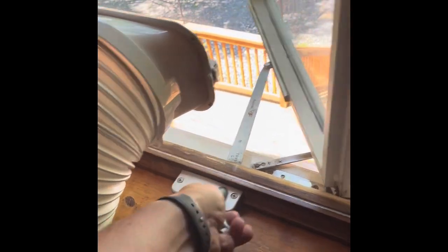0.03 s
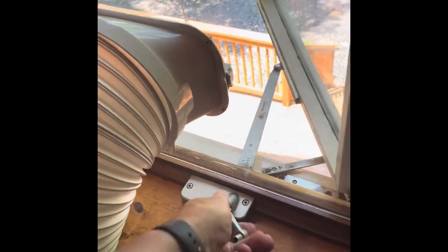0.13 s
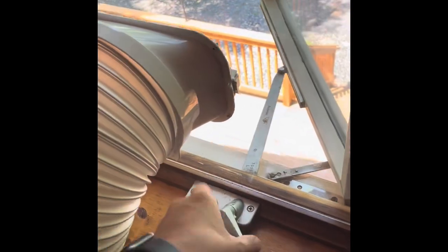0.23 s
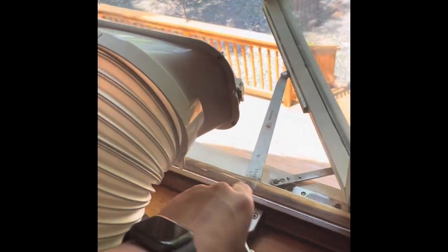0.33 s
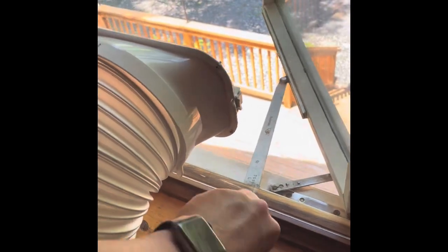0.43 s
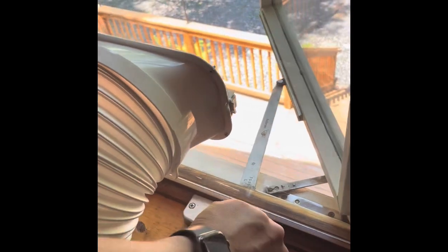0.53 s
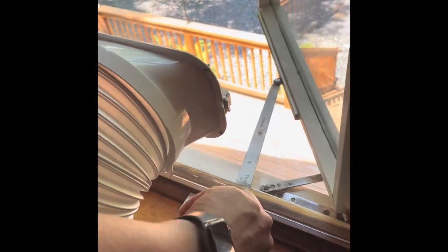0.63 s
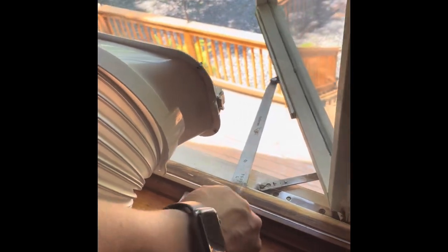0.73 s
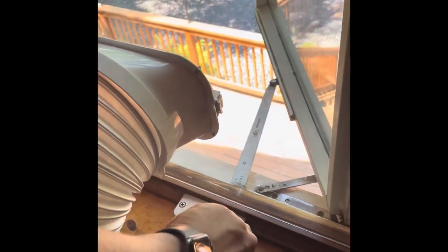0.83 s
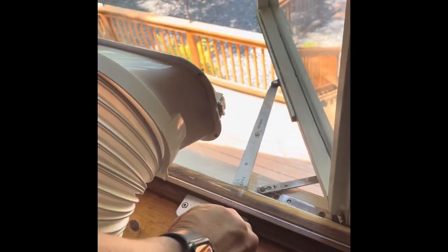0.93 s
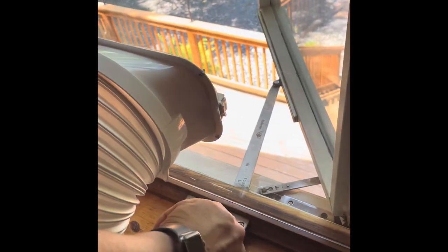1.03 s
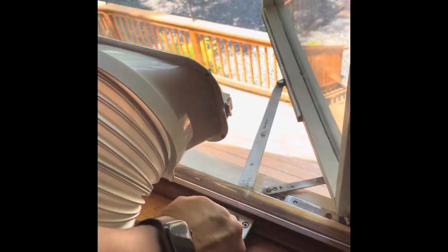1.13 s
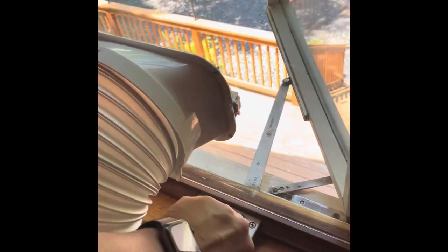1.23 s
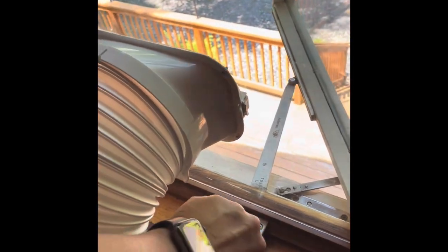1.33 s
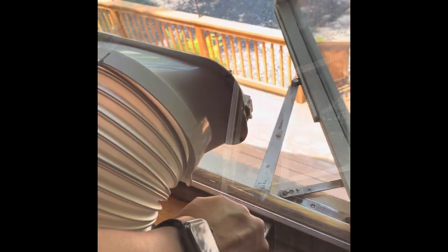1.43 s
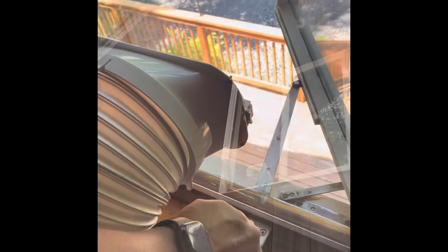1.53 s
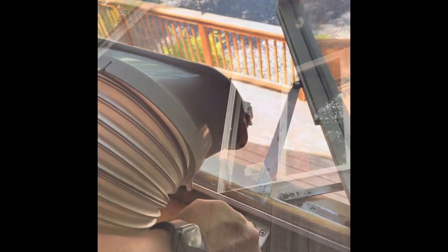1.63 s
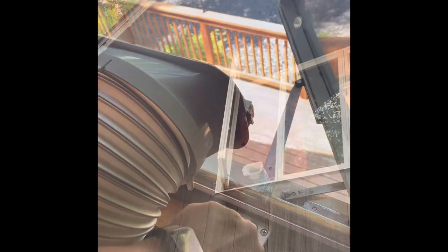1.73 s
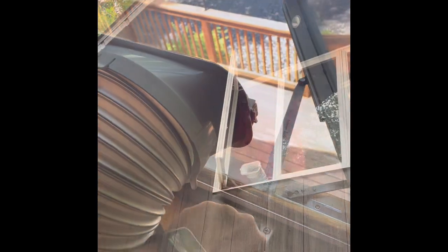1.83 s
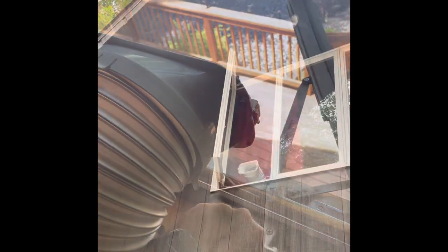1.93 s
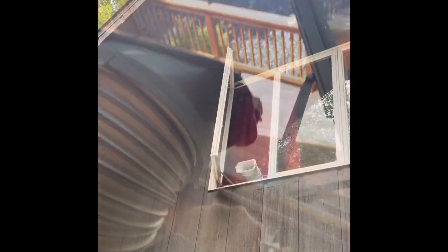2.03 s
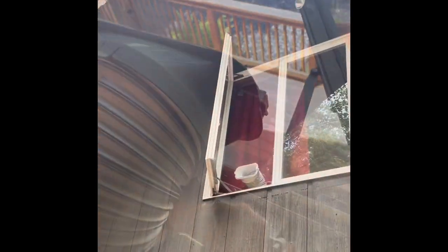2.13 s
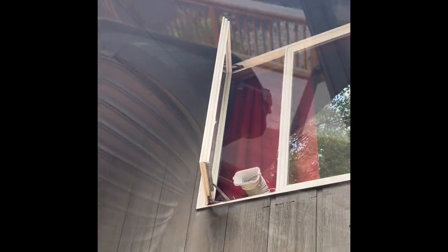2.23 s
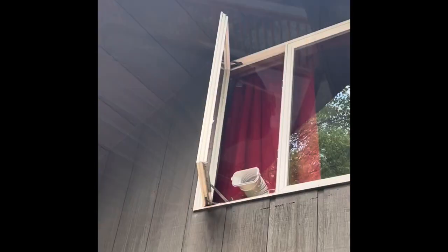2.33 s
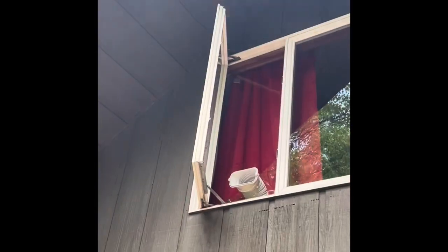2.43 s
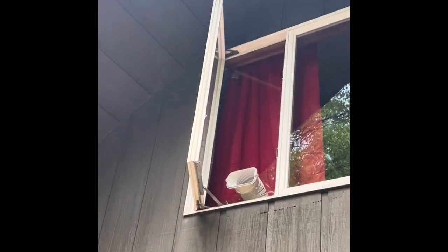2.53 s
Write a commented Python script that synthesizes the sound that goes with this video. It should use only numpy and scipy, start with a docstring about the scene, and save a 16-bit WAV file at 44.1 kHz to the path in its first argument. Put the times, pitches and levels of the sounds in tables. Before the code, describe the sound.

A casement window is cranked by hand, its gears and metal arm clacking and clicking.

```python
"""In a small room, a casement window is cranked by hand. Slack in the gears and the arm takes up in clicks and
knocks, impacts that excite the damped modes of the wooden frame and the metal arm. Stick-slip friction makes
the gears grind faintly. The hand bumps, rubs and rustles, and later the sleeve briefly rasps. A low rumble and
open air lie underneath, and the hum of a distant machine fades in."""
import sys
import numpy as np
from scipy import signal
from scipy.fft import rfft, irfft
from scipy.io import wavfile
from scipy.ndimage import uniform_filter1d

SR = 44100
rng = np.random.default_rng(int(sys.argv[2]) if len(sys.argv) > 2 else 0)


def output_pcm(signal):
    """Save a mono or channel-first signal as 16-bit PCM at the path in sys.argv[1].

    Samples are clipped to [-1, 1] before scaling.
    """
    pcm = np.clip(np.atleast_2d(signal).T, -1, 1) * 32767
    wavfile.write(sys.argv[1], SR, np.round(pcm).astype(np.int16))


N = 114660
TIME = np.arange(N) / SR

# The latch gives one hard clack. Each row: start in seconds, then the levels in dB of the # body, low-mid,
# high-mid and treble registers.
LATCH_CLACK = [(.2295, -22, -20, -17.5, -26.5)]
# Gears and arm take up their slack. Each row: start in seconds, then the same four levels in dB.
GEAR_KNOCKS = [(.111, -53, -52.5, -68, -67), (.132, -37.5, -47, -57.5, -62),
               (0.169, -49, -49.5, -56, -54.5), (0.201, -46, -51.5, -71, -81),
               (.261, -49, -49.5, -44.5, -53.5), (.348, -42.5, -73, -83, -81), (0.46, -26, -30, -41, -64.5),
               (.504, -38.5, -44, -54, -71), (.518, -33, -65, -68, -89), (0.5578, -18, -27.5, -33, -48),
               (0.5934, -24, -33, -39, -53), (0.7089, -34, -39, -53.5, -65.5),
               (.722, -33.5, -55, -59.5, -92), (0.7753, -43.5, -42.5, -46, -61.5),
               (.879, -50.5, -48, -68.5, -89), (0.8905, -28, -42, -65, -81),
               (1.012, -51.5, -59.5, -79, -72), (1.102, -81, -83, -70.5, -74),
               (1.411, -72, -66.5, -72, -68), (1.5100, -46, -56.5, -51.5, -54),
               (1.812, -50.5, -65, -60, -68), (1.843, -58, -62.5, -59, -65), (1.881, -51.5, -46, -53, -80),
               (2.047, -57, -64.5, -60, -80), (2.060, -53.5, -66, -76.5, -76),
               (2.2783, -49, -52, -68.5, -86), (2.3109, -37.5, -49.5, -62.5, -75.5)]
# Registers of the frame. Each row: lower and upper edge in Hz, lag of the bending wave in ms, then
# the relative levels in dB of the dense modes, the first push and the room.
FRAME_REGISTERS = [(350.7, 560, 2.4, -12.5, -5.5, -11.5), (593, 1172, 1.0, 0.5, -13.5, -14.5),
                   (1370, 3440, 0.3, -5.5, -12, -18), (4000, 7300, 0.057, -1.5, -10.5, -20.5)]
# Each entry: level of left over right in dB for one register.
REGISTER_BALANCE = [3.5, 4.2, 1.3, .2]
def knocks(blows, ring_db, **contact):
    """Dispersion of bending waves: treble arrives first, body last. ring_db favours the clear modes."""
    out = 0
    for k, (low_hz, high_hz, lag_ms, dense_db, push_db, room_db) in enumerate(FRAME_REGISTERS):
        direct = np.zeros(N)
        for start, *levels_db in blows:
            blow = strike(low_hz, high_hz, dense_db - ring_db, push_db - ring_db, **contact)
            add(direct, start + lag_ms / 1000, from_db(levels_db[k]) * blow)
        out = out + at_ports(direct + from_db(room_db) * room(direct), REGISTER_BALANCE[k])
    return out


# Modes of the wooden frame. Each row: frequency in Hz, level in dB, 60 dB decay time in seconds.
WOOD_MODES = [(438, 0.5, 0.036), (504, 0.5, 0.049), (680, 0, 0.055), (774, 3.5, 0.032), (1070, -9, 0.024),
              (1223, -5, 0.04), (1575, -3, 0.034), (1850, -4.5, 0.035), (2020, -7, .035)]
# Modes of the metal arm. Each row: frequency in Hz, level in dB, 60 dB decay time in seconds.
METAL_MODES = [(2334, 7, 0.025), (3096, -11, 0.053), (3380, -4.5, 0.034), (4300, -9.5, 0.0053),
               (5950, 1.5, 0.006), (6850, -6.5, .012)]
def strike(low_hz, high_hz, dense_db, push_db, detune, scatter_db, rise_s, arm_db):
    """Modal superposition: in one band, a blow sums a push, clear modes and a wash of dense modes."""
    t = TIME[:SR // 8]
    band = signal.butter(3, [low_hz, high_hz], "band", fs=SR, output="sos")
    # the arm's ring shifts with the point of contact
    arm = [(hz * np.exp(detune * rng.uniform(-1, 1)), db + arm_db, t60) for hz, db, t60 in METAL_MODES]
    clear = sum(from_db(db + scatter_db * rng.normal()) * np.sin(2 * np.pi * hz * t) * decay(t, t60)
                for hz, db, t60 in WOOD_MODES + arm)
    crack = from_db(8) * decay(t, t60=0.003)
    dense = rng.standard_normal(len(t)) * (decay(t, t60=0.055) + crack)
    parts = [(clear, 0), (dense, dense_db), (signal.unit_impulse(len(t)), push_db)]
    blow = sum(from_db(db) * unit_rms(signal.sosfilt(band, part)) for part, db in parts)
    blow *= 1 - np.exp(-t / rise_s)
    return blow / np.sqrt(uniform_filter1d(blow ** 2, size=176).max())  # loudest 4 ms at rms 1


# Metal meets metal. Each row: start in seconds, level of the exciting burst in dB, resonance in Hz,
# 60 dB decay time in seconds.
METAL_TICKS = [(.095, -51, 8500, 0.0091), (.112, -50, 9000, 0.0088), (.133, -46.5, 9000, 0.0087),
               (.170, -42.5, 7160, .009), (.2297, -13, 8900, 0.016), (.391, -52, 7420, 0.0071),
               (.4615, -40, 2700, 0.019), (0.5593, -27, 3420, .022), (.595, -26.5, 3380, 0.012),
               (0.775, -39, 2830, .025), (1.160, -55.5, 10100, 0.0096), (1.411, -58, 6900, 0.01),
               (1.511, -36, 4250, 0.0094), (1.528, -42, 5500, .009), (1.844, -40, 4500, .014),
               (1.987, -53, 6000, .008), (2.148, -59.5, 9500, 0.0091)]
def ticks():
    """Impact excitation: a hard contact drives a broad treble resonance for a few milliseconds."""
    out, t = np.zeros(N), TIME[:SR // 20]
    for start, db, hz, t60 in METAL_TICKS:
        burst = rng.standard_normal(len(t)) * decay(t, t60)
        resonance = signal.iirpeak(hz, Q=1.5, fs=SR)
        add(out, start, from_db(db) * signal.lfilter(*resonance, signal.lfilter(*resonance, burst)))
    return at_ports(out + from_db(-19.5) * room(out))


# Grinding of the gears. Each row: time in seconds, level in dB.
GRIND_LEVELS = [(0, -64), (.07, -57.5), (.12, -55), (.21, -46), (.3, -56), (.42, -59), (.52, -50),
                (.66, -51.5), (.75, -60), (.83, -57.5), (.92, -64.5), (1.03, -63), (1.1, -83.5),
                (1.40, -78), (1.45, -63), (1.5, -69.5), (1.6, -71), (2.6, -73.5)]
# Its spectrum. Each row: frequency in Hz, relative level in dB.
GRIND_SPECTRUM = [(120, -24), (280, -0.5), (420, -1), (600, -8.5), (900, -13.5), (1500, -22), (3000, -30.5),
                  (6000, -42.5), (11000, -49.5), (15000, -56)]
def gear_grind():
    """Sliding friction between the gears gives a faint, low grinding."""
    return stick_slip(GRIND_LEVELS, GRIND_SPECTRUM, patchy_db=6, pan_db=5.5)


# Rasp of the sleeve. Each row: time in seconds, level in dB.
RASP_LEVELS = [(1.6, -120), (1.66, -80.5), (1.72, -63), (1.78, -69), (1.795, -59), (1.815, -52),
               (1.832, -62.5), (1.845, -59), (1.862, -52), (1.885, -80), (1.92, -120)]
# Its spectrum. Each row: frequency in Hz, relative level in dB.
RASP_SPECTRUM = [(380, -21.5), (490, 7.5), (620, -17.5), (1100, -14.5), (1380, -5), (1900, -11.5),
                 (2600, -6.5), (2930, 4.5), (3400, -7), (3800, -8), (4400, -1), (5500, -11), (6800, -8),
                 (8500, -27), (14000, -44)]
def sleeve_rasp():
    """Friction of the sleeve, shaped by resonant peaks, gives a brief striated rasp."""
    return stick_slip(RASP_LEVELS, RASP_SPECTRUM, patchy_db=7.5)


# The hand bumps the sill. Each row: start in seconds, peak level in dB, mid-glide frequency in Hz.
SILL_BUMPS = [(0.079, -44, 232), (.243, -40.5, 105), (0.603, -42.5, 183), (0.898, -35.5, 297.7),
              (1.276, -48.5, 200), (1.295, -44, 169.8), (1.519, -46.5, 239), (1.676, -40, 220.5),
              (1.71, -44.5, 161), (1.935, -41.5, 62), (2.057, -46, 168.7)]
def hand_bumps(rise_s=0.0014, t60=0.078, sag=0.73):
    """Soft impacts give dull thuds; by dispersion the lowest waves arrive last and the pitch sags."""
    out, t = np.zeros(N), TIME[:SR // 5]
    envelope = (1 - np.exp(-t / rise_s)) ** 2 * decay(t, t60)
    envelope /= envelope.max()
    pitch_ratio = 1 + sag * (decay(t, t60) - .5)
    phase_per_hz = 2 * np.pi * np.cumsum(pitch_ratio) / SR
    for start, db, hz in SILL_BUMPS:
        add(out, start, from_db(db) * envelope * np.sin(hz * phase_per_hz))
    return at_ports(out)


# Rubbing of skin and sleeve. Each row: time in seconds, level in dB.
RUB_LEVELS = [(0, -76), (.6, -72.5), (.69, -74), (.8, -89.5), (1.14, -86.5), (1.19, -73), (1.23, -82),
              (1.275, -64), (1.32, -85.5), (1.58, -84.5), (1.69, -58.5), (1.775, -68), (1.81, -62.5),
              (1.865, -63.5), (1.9, -75.5), (1.96, -68.5), (2.03, -88.5), (2.6, -107.5)]
# Its spectrum. Each row: frequency in Hz, relative level in dB.
RUB_SPECTRUM = [(200, -16), (480, 5), (830, -8.5), (1400, -12), (1950, -9.5), (3000, -1.5), (5000, -2),
                (7000, -10), (8500, -16.5), (11000, -21), (14000, -41)]
def hand_rub():
    """Sliding friction of skin and sleeve radiates soft broadband noise."""
    return stick_slip(RUB_LEVELS, RUB_SPECTRUM, patchy_db=5.5)


# Rustle of the grip. Each row: time in seconds, level in dB.
RUSTLE_LEVELS = [(0, -80), (.08, -86), (.13, -71.5), (.2, -70.5), (.3, -79), (.36, -75), (.43, -80.5),
                 (.52, -75), (.62, -82), (.94, -95.5), (1.0, -80), (1.025, -73), (1.06, -88.5),
                 (1.15, -110)]
# Its spectrum. Each row: frequency in Hz, relative level in dB.
RUSTLE_SPECTRUM = [(1200, -6), (2200, 1), (3500, -11.5), (8000, -8), (10500, -4), (12000, -2), (14000, -12)]
def grip_rustle():
    """Micro-slip of the grip on the handle gives a fine, bright rustle."""
    return stick_slip(RUSTLE_LEVELS, RUSTLE_SPECTRUM, patchy_db=9.5)


# Background rumble. Each row: time in seconds, level in dB.
RUMBLE_LEVELS = [(0, -53), (.6, -53.5), (1.15, -57.5), (1.55, -57), (1.75, -52), (2.07, -55), (2.25, -57),
                 (2.6, -57)]
# Its spectrum. Each row: frequency in Hz, relative level in dB.
RUMBLE_SPECTRUM = [(20, -14), (40, -2), (60, 2.5), (110, -4), (200, -12), (300, -19.5), (500, -38.5),
                   (1500, -52.5), (5000, -57), (14000, -57)]
def rumble():
    """Random noise with its energy at low frequencies is heard as a rumble."""
    return ambience(RUMBLE_LEVELS, RUMBLE_SPECTRUM)


# Open air. Each row: time in seconds, level in dB.
AIR_LEVELS = [(0, -88), (1.45, -90.5), (1.9, -62), (2.2, -72), (2.37, -63.5), (2.6, -69.5)]
# Its spectrum. Each row: frequency in Hz, relative level in dB.
AIR_SPECTRUM = [(100, -4), (300, 7), (600, -7), (1200, -17), (2800, -19.5), (6000, -29), (13000, -43.5)]
def open_air():
    """Broadband ambient noise, strongest in the low middle, swells in the second half."""
    return ambience(AIR_LEVELS, AIR_SPECTRUM)


# Tones of a distant machine. Each row: frequency in Hz, nominal rms level in dB once faded in.
MACHINE_TONES = [(86.5, -56.5), (145, -57.5)]
def machine_hum(start_s=1.48, full_s=2.5, waver=0.44):
    """Slow random modulation of amplitude and phase makes two low tones waver as they fade in."""
    fade = np.clip((TIME - start_s) / (full_s - start_s), 0, 1)
    knots = np.linspace(0, TIME[-1], 30)
    out = 0
    for hz, db in MACHINE_TONES:
        swell, sway = (waver * np.interp(TIME, knots, rng.standard_normal(len(knots))) for _ in range(2))
        out = out + np.sqrt(2) * from_db(db) * (1 + swell) * np.sin(2 * np.pi * hz * TIME + sway)
    return fade * out


def stick_slip(levels, spectrum, patchy_db, pan_db=0, slips_per_s=3000, catches_per_s=110):
    """Stick-slip friction: dense tiny impulses swell and fade as the surfaces catch and let go."""
    slips = (rng.random(N) < slips_per_s / SR) * rng.choice([-1, 1], N)
    catch = np.interp(TIME * catches_per_s, np.arange(1000), rng.uniform(-1, 1, 1000))
    scrape = coloured(slips * from_db(patchy_db * catch), spectrum)
    return at_ports(gain_curve(levels) * scrape, pan_db)


def ambience(levels, spectrum, width_db=-19.5):
    """Partial coherence: a weak difference signal leaves smooth noise nearly alike on both sides."""
    mid, side = (coloured(rng.standard_normal(N), spectrum) for _ in range(2))
    return gain_curve(levels) * (at_ports(mid) + from_db(width_db) * side * np.array([[1], [-1]]))


def room(x):
    """Reverberation: dense reflections in a small room build up, then decay exponentially."""
    t = TIME[:SR // 2]
    build_up = 1 - decay(t, t60=0.039)
    tail = rng.standard_normal(len(t)) * decay(t, t60=0.081) * build_up
    return signal.fftconvolve(x, tail / np.linalg.norm(tail))[:N]


# Lead of the left microphone port. Each row: frequency in Hz, phase in radians.
LEFT_PORT_LEAD = [(0, 0), (1200, -.1), (4100, 1.7), (4900, -.1), (7500, 3.1), (10800, 6.3), (13700, 9.4)]
def at_ports(x, pan_db=0):
    """Phase and level differences: sound reaches the left port earlier, and louder by pan_db."""
    lead = np.interp(np.fft.rfftfreq(N, 1 / SR), *np.transpose(LEFT_PORT_LEAD))
    right = irfft(rfft(x) * np.exp(-1j * lead), N)
    return np.array([x * from_db(pan_db / 2), right * from_db(-pan_db / 2)])


def coloured(x, spectrum):
    """Linear filtering: impose a spectrum, interpolated over log frequency, and scale to rms 1."""
    hz, db = np.transpose(spectrum)
    bins_hz = np.maximum(np.fft.rfftfreq(N, 1 / SR), 1)
    gain = from_db(np.interp(np.log(bins_hz), np.log(hz), db))
    return unit_rms(irfft(rfft(x) * gain, N))


def from_db(db):
    """Amplitude ratio of a level in decibels."""
    return 10 ** (np.asarray(db) / 20)


def unit_rms(x):
    """Normalisation to rms 1."""
    return x / np.sqrt(np.mean(x ** 2) + 1e-20)


def gain_curve(levels):
    """Amplitude envelope through points of time in seconds and level in dB."""
    return from_db(np.interp(TIME, *np.transpose(levels)))


def decay(t, t60):
    """Exponential damping by 60 dB in t60 seconds."""
    return np.exp(-np.log(1000) * t / t60)


def add(out, start_s, x):
    """Superposition of x on out from start_s onward."""
    i = int(start_s * SR)
    out[i:i + len(x)] += x[:N - i]


def scene():
    """Superposition: the pressures of crank, hand and background add."""
    clack = knocks(LATCH_CLACK, ring_db=5.5, detune=0, scatter_db=0, rise_s=0.00045, arm_db=1)
    slack = knocks(GEAR_KNOCKS, ring_db=1, detune=.22, scatter_db=2.0, rise_s=0.00033, arm_db=-1.5)
    crank = clack + slack + ticks() + gear_grind() + sleeve_rasp()
    hand = hand_bumps() + hand_rub() + grip_rustle()
    return crank + hand + rumble() + open_air() + machine_hum()


def record(dry):
    """Low-pass filtering: the microphone dulls the highest treble, and a steep edge cuts the top."""
    dulled = signal.sosfilt(signal.butter(3, 12000, fs=SR, output="sos"), dry)
    return signal.sosfilt(signal.butter(14, 15800, fs=SR, output="sos"), dulled)


dry = scene()
out = record(dry)
output_pcm(out)
```